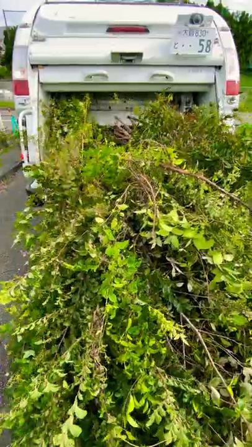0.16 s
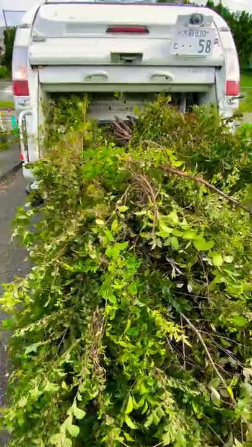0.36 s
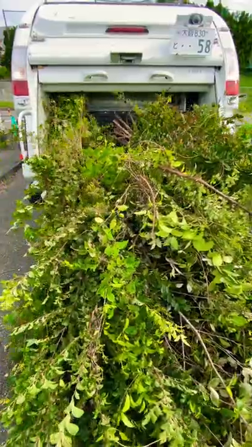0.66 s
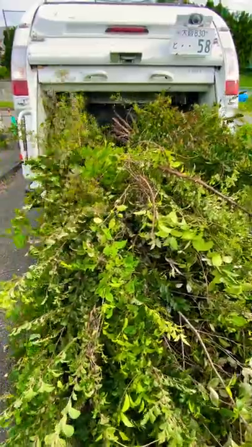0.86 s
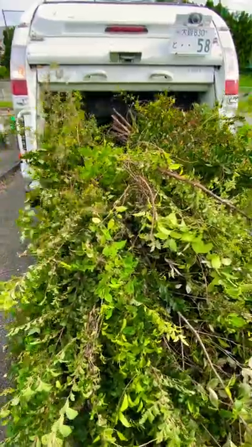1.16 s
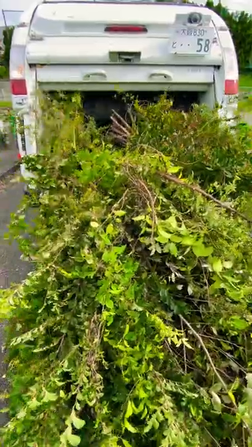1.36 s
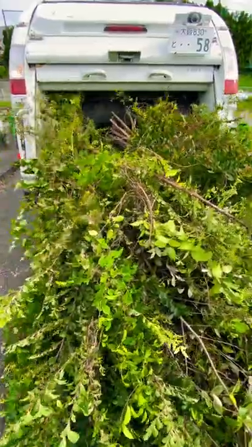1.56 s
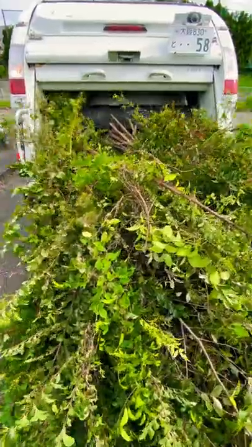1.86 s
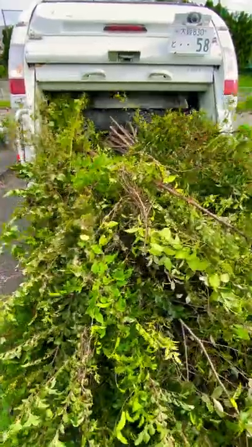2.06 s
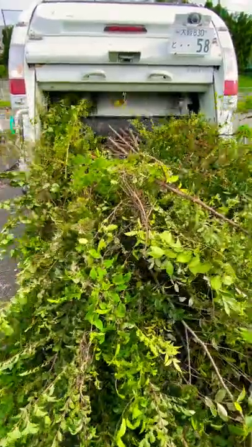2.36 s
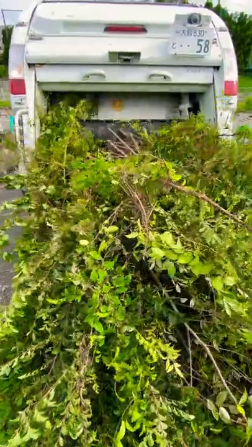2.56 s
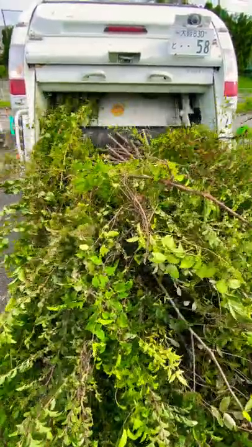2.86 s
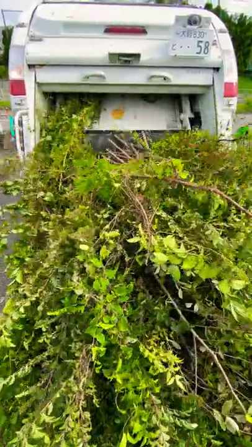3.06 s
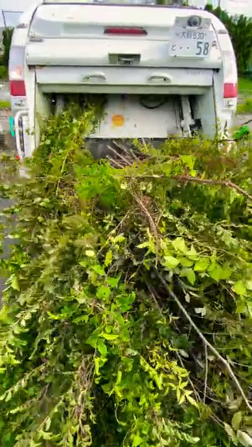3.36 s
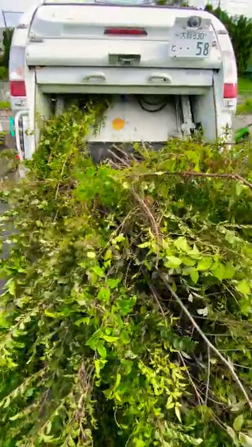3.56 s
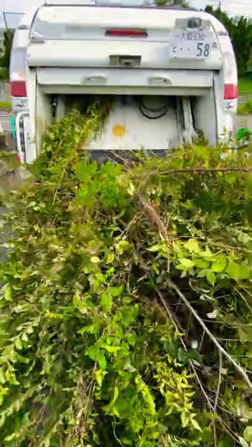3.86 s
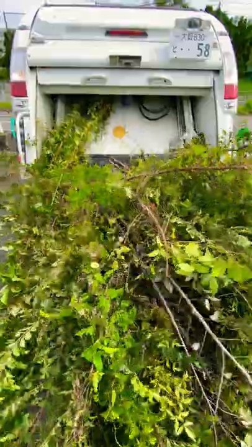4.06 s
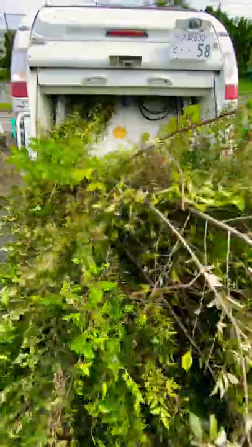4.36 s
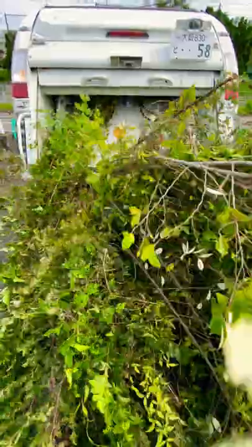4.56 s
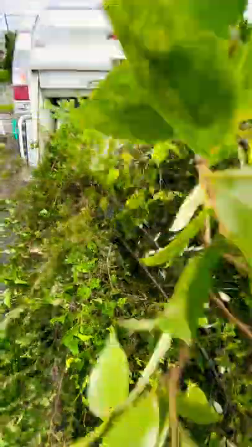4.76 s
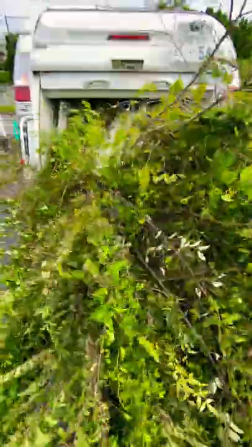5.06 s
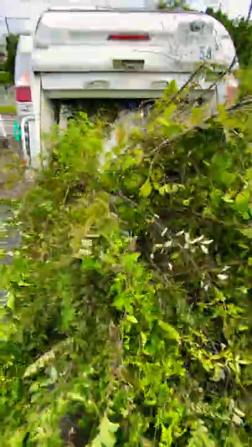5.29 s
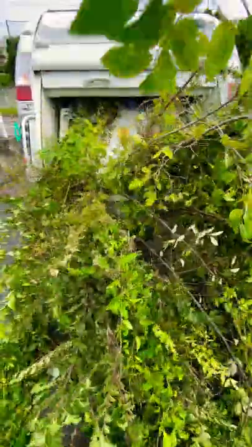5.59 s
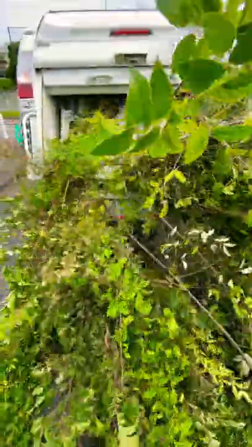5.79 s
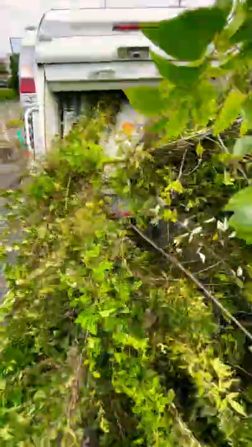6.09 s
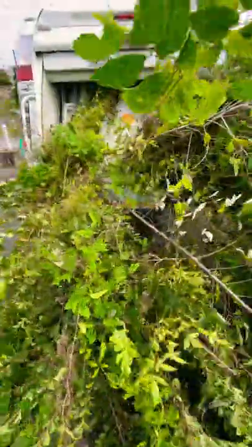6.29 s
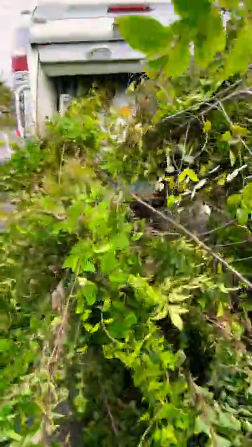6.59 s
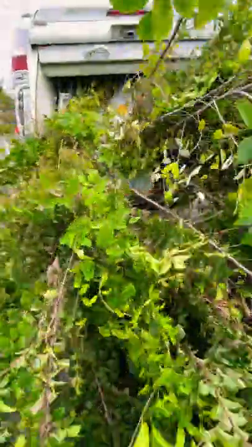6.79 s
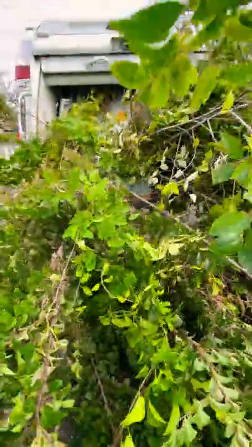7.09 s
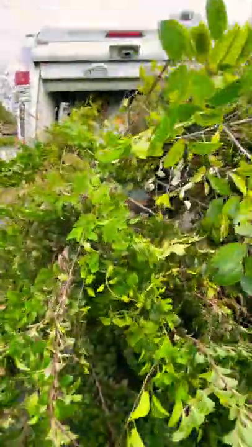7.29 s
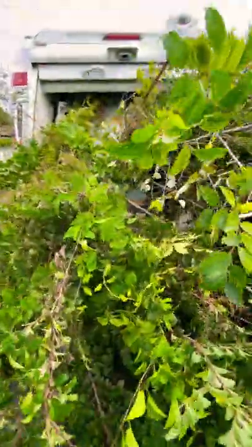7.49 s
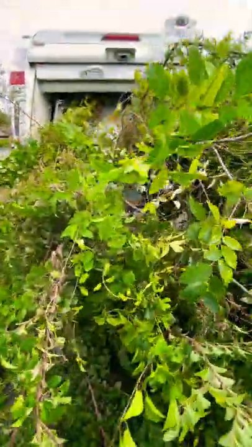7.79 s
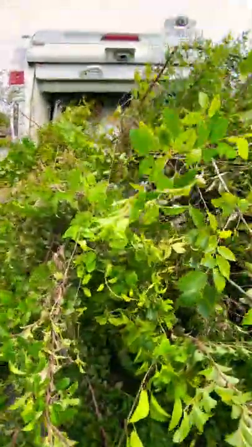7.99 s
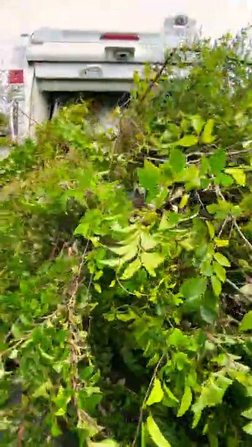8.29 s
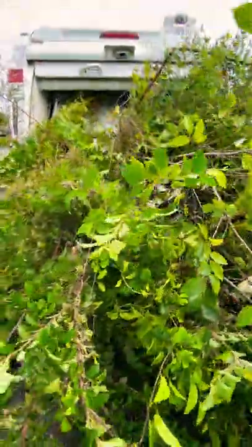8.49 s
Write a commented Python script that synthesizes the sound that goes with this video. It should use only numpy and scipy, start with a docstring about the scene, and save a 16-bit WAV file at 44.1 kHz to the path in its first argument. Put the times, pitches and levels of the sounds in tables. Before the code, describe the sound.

From the start a diesel at fast idle clatters and drones nearby outdoors, with a low hydraulic hum around it, swelling in uneven loads, and a faint high valve whistle fading by about 1.2 s. At 1.2 s a loud sharp snap and booming steel knock ring from the hopper. Light snaps follow near 1.9 to 2 s while leaf rustle and twig ticks gradually thicken. From 3.8 to 4.3 s snaps, dull crunching thumps and hopper knocks gather with a strong rustling tug. At 4.5 to 4.8 s leaves scrape and tap right on the microphone, ducking the truck. The pump pitch sags near 5 s; low wind puffs come until about 6.5 s. Woody cracks hit at 5.5, 5.9 and 6.06 s, the last with rattling metal and a crunch at 6.15 s. Afterwards the rustle subsides; engine clatter, whine and weaker hum continue to 8.6 s, with a small snap near 7.9 s.

```python
"""A heap of leafy branches is dragged into the hopper of a rear-loading garbage truck, close to a phone.
Leaves are dense noise ticks, twigs and snaps short dying bursts; boughs and blows on the steel ring modes.
The diesel is shaped noise and tones at fast idle; the hydraulic pump is a harmonic hum whose pitch sags
and whose level swells under load. Leaves swipe the microphone in gritty strokes, then low noise buffets it."""
import sys
import numpy as np
from scipy import signal
from scipy.fft import rfft, irfft
from scipy.io import wavfile
from scipy.ndimage import uniform_filter1d

SR = 44100
rng = np.random.default_rng(int(sys.argv[2]) if len(sys.argv) > 2 else 0)


def generate_wav(signal):
    """Clip the signal to [-1, 1] and save it as 16-bit WAV at the path in sys.argv[1]."""
    frames = np.transpose(np.atleast_2d(signal))
    scaled = np.clip(frames, -1, 1) * 32767
    pcm = np.round(scaled).astype(np.int16)
    wavfile.write(sys.argv[1], SR, pcm)


N = 381024
TIME, BINS = np.arange(N) / SR, np.fft.rfftfreq(N, 1 / SR)  # seconds, Hz


def gain_of(db):
    """Decibels to amplitude."""
    return 10 ** (np.asarray(db) / 20)


def evened(x):
    """Scales to rms 1."""
    return x / np.sqrt(np.mean(x ** 2) + 1e-20)


def curves(rows):
    """Each column of a timed table, interpolated sample by sample."""
    seconds, *columns = np.transpose(rows)
    return [np.interp(TIME, seconds, column) for column in columns]


def read(rows, hz):
    """Each column of a frequency table, joined on a log axis."""
    f, *columns = np.transpose(rows)
    return [np.interp(np.log(hz + 1), np.log(f + 1), column) for column in columns]


def colour(x, spectrum, extra_db=0):
    """Filters x through a spectrum, then scales it to rms 1."""
    gain = gain_of(read(spectrum, BINS)[0] + extra_db)
    return evened(irfft(rfft(x) * gain, N))


def band(x, hz, spread, order=3):
    """A broad causal band from hz / spread to hz * spread."""
    spread = max(spread, 1.1)
    edges = [hz / spread, min(hz * spread, .45 * SR)]
    return signal.sosfilt(signal.butter(order, edges, "band", fs=SR, output="sos"), x)


def wander(hz):
    """Slow chance up to about hz, rms 1."""
    return evened(irfft(rfft(rng.standard_normal(N)) * np.exp(-(BINS / hz) ** 2), N))


def held(start, length, attack, release):
    """Attack, hold and release, from 0 to 1; the release begins after length."""
    rise = (TIME - start) / attack
    fall = 1 - (TIME - start - length) / release
    return np.clip(np.minimum(rise, fall), 0, 1)


def surges(rows):
    """A bell-shaped gain for each row."""
    return [gain_of(db) * np.exp(-((TIME - middle) / half) ** 2 / 2) for middle, half, db in rows]


def together(*gains):
    """Gains that add in power."""
    return np.sqrt(sum(g ** 2 for g in gains))


def add(mix, s, sound):
    """Adds a two-channel sound at time s."""
    part = mix[:, round(s * SR):][:, :sound.shape[1]]
    part += sound[:, :part.shape[1]]


def at_level(x, db):
    """Sets the level of the loudest few milliseconds."""
    power = uniform_filter1d((x ** 2).mean(0), size=260)
    return gain_of(db) * x / np.sqrt(power.max())


def tone(hz, gain, waver_db):
    """A sine on a pitch curve whose strength wavers."""
    turns = np.cumsum(hz) / SR + rng.random()
    return np.sqrt(2) * gain * gain_of(waver_db * wander(4.6)) * np.sin(2 * np.pi * turns)


def crackle(per_s, spread_db):
    """Random clicks, mostly small and a few large."""
    size = gain_of(spread_db * np.minimum(rng.exponential(1, N), 5))
    return size * (rng.random(N) < per_s / SR) * rng.choice([-1, 1], N)


def scatter(t60, order=16000):
    """A dense dying cloud of reflections, different for each port; order is its length in samples."""
    t = np.arange(order) / SR
    return rng.standard_normal((2, order)) * gain_of(-60 * t / t60)


# Wind rumble on the microphone. Each row: frequency in Hz, relative spectrum level in dB.
BUFFET = [(10, -29), (30, 1), (56, 8.5), (75, 11), (110, 8.5), (170, -6), (280, -9.5), (700, -77)]
# Puffs from swiping leaves and gusts of breeze. Each row: middle in s, bell half-length in s, level in dB.
GUSTS = [(4.55, .025, -25), (4.64, 0.058, -23), (4.765, 0.022, -22), (5.1, .1, -34), (5.8, 0.062, -22),
         (6.23, 0.11, -18), (6.5, 0.044, -17)]
# One breath of breeze.
BREEZE_START_S, BREEZE_LENGTH_S, BREEZE_ATTACK_S, BREEZE_RELEASE_S, BREEZE_DB = 4.72, 1.7, 0.59, 1.9, -23


def wind():
    """Lumpy low eddies from the breeze and passing leaves, opposite in sign in the two channels."""
    eddies = colour(rng.standard_normal(N) * gain_of(2.1 * wander(13)), BUFFET)
    breeze = gain_of(BREEZE_DB) * held(BREEZE_START_S, BREEZE_LENGTH_S, BREEZE_ATTACK_S, BREEZE_RELEASE_S)
    return together(breeze, *surges(GUSTS)) * eddies * np.array([[1.1], [-.8]])


# Tone of the engine's low rumble. Each row: frequency in Hz, relative spectrum level in dB.
RUMBLE = [(10, -50.5), (22, -46.5), (35, -13), (58, 1.5), (90, 0), (130, -4), (190, -3), (270, -14.5),
          (400, -31.5), (900, -69)]
# Rumble fader. Each row: time in seconds, level in dB.
RUMBLE_LEVEL = [(0, -30), (1.1, -30.5), (1.6, -27), (2.6, -30.5), (3.8, -29), (4.3, -32.5), (5.5, -36),
                (6.4, -36), (7.1, -46), (7.6, -43), (8.1, -34)]


def engine_rumble():
    """The engine's low rumble: shaped noise, not dipped during the swipes."""
    return gain_of(curves(RUMBLE_LEVEL)[0]) * colour(rng.standard_normal((2, N)), RUMBLE)


FIRING_HZ = 37.67  # mean firing rate of the engine
# Whine of belts and gears. Each row: pitch in Hz, level in dB before the whine fader.
WHINE = [(549, -57), (619, -47), (657, -44.5), (926, -51), (1061, -55), (1410, -54), (1631, -56.5)]
# Whine fader, clearest beside the truck. Each row: time in seconds, added level in dB.
WHINE_LEVEL = [(0, 2), (.9, 4.5), (2, -2), (4.3, -13), (5.5, 2), (7.2, 6)]
# Steady exhaust drone. Each row: multiple of the firing rate, level in dB.
DRONE_ORDERS = [(2, -41), (4, -45.5)]
# Passing exhaust booms. Each row: start in seconds, length in seconds, multiple of the firing rate,
# level in dB.
BOOMS = [(-.13, 0.37, 4, -29.5), (4.04, 0.2, 2, -25), (7.056, 0.89, 4, -34.5), (7.917, .7, 2, -33)]
BOOM_ATTACK_S, BOOM_RELEASE_S = 0.12, 0.66


def engine_tones():
    """Exhaust drone and the whine of belts and gears, all on one unsteady shaft speed."""
    speed = 1 + 0.00248 * wander(3.53) + 0.00838 * wander(27.2)
    whine_db = curves(WHINE_LEVEL)[0]
    out = sum(tone(hz * speed, gain_of(db + whine_db), waver_db=3.5) for hz, db in WHINE)
    for order, steady_db in DRONE_ORDERS:
        booms = [gain_of(db) * held(start, length, BOOM_ATTACK_S, BOOM_RELEASE_S)
                 for start, length, boom_order, db in BOOMS if round(boom_order) == round(order)]
        drone = together(gain_of(steady_db), *booms)
        out += tone(round(order) * FIRING_HZ * speed, drone, waver_db=2.5)
    return out


# Tone of the clatter before the panels. Each row: frequency in Hz, relative spectrum level in dB.
CLATTER = [(80, -24), (150, -2), (200, 6.5), (280, -1), (380, -2.5), (470, -1.5), (600, -5.5), (850, -3),
           (1100, -7), (1600, -9), (2000, -11.5), (2500, -13), (3200, -16.5), (3900, -18.5), (6000, -20),
           (12000, -47)]
# Body panel resonances and one dip. Each row: centre in Hz, width in Hz, gain in dB.
PANELS = [(446, 100, 4), (640, 27, 3.5), (1061, 10.4, 12.5), (1464, 18, -13.5), (1600, 78, 1),
          (2360, 170, 2), (3120, 144, 5), (5600, 130, 7.5)]
# Change of tone beside the truck. Each row: frequency in Hz, relative gain in dB.
BESIDE = [(160, 6.5), (220, -1), (310, -1.5), (500, 0.6), (850, -2.5), (1500, 2), (2500, 0), (4000, -1)]
CLATTER_DB, BESIDE_DB = -27, 1.37  # level away from the side, and the lift beside the truck
SIDESTEP_START_S, SIDESTEP_LENGTH_S = 6, 0.85  # the phone steps beside the truck


def engine_clatter():
    """An uneven puff of noise at every firing, coloured by the body panels."""
    firings = np.cumsum(FIRING_HZ * (1 + .02 * wander(10))) / SR
    puffs = 1 + 0.18 * np.exp(-(firings % 1) / 0.47) * gain_of(5.4 * wander(33))
    panels_db = sum(db / (1 + (2 * (BINS - hz) / width) ** 2) for hz, width, db in PANELS)
    clatter = colour(puffs * rng.standard_normal((2, N)), CLATTER, panels_db)
    beside = gain_of(BESIDE_DB) * colour(clatter, BESIDE)
    aside = np.clip((TIME - SIDESTEP_START_S) / SIDESTEP_LENGTH_S, 0, 1)
    return gain_of(CLATTER_DB) * ((1 - aside) * clatter + aside * beside)


# Valve whistle early in the stroke. Each row: time in seconds, pitch in Hz, level in dB.
VALVE = [(0, 2520, -49), (.14, 2570, -41), (.17, 2430, -50), (.37, 2465, -45), (.7, 2450, -55),
         (1.1, 2502, -51), (1.2, 2502, -58)]


def valve():
    """A faint unsteady whistle, probably oil passing a valve."""
    hz, db = curves(VALVE)
    return tone(hz * (1 + 0.0055 * wander(80)), gain_of(db), waver_db=4.5)


# Gear whine. Each row: time in seconds, pitch in Hz, level in dB.
GEAR = [(0, 463, -41), (1.1, 458, -36.5), (1.6, 478, -50), (2.3, 486, -37), (3.2, 486, -51.5),
        (4.3, 488, -48), (5.4, 467, -41.5), (7.2, 472, -39.5), (8.6, 467, -35)]


def gear():
    """A gear's whine drifts in pitch as the blade works."""
    hz, db = curves(GEAR)
    return tone(hz * (1 + 0.0047 * wander(19.2)), gain_of(db), waver_db=2.5)


# Pump fundamental. Each row: time in seconds, pitch in Hz.
PUMP_SPEED = [(0, 109.2), (1.35, 108.7), (1.6, 111.6), (2.1, 109.6), (4, 112.2), (4.2, 113.3),
              (4.75, 112.1), (5.03, 105.9), (5.45, 108.1), (5.9, 108.9), (6.15, 105.8), (6.45, 108.4)]
# Upper overtones running free. Each row: multiple of the fundamental, level in dB.
PUMP_OVERTONES = [(3, -44), (4, -47.5), (5, -49.5), (6, -62)]
# The blade loads the pump. Each row: start in seconds, length in seconds, fundamental in dB, octave in dB.
LOADS = [(0, 0.34, -25.5, -26.5), (1.14, 0.19, -23, -27.5), (1.44, 0.72, -31, -30), (1.677, .2, -36, -28.5),
         (2.234, .52, -38, -29), (2.93, .6, -33.5, -30), (3.66, 0.36, -46, -25.5), (4.098, 0.24, -30, -27),
         (4.822, 0.5, -51, -26), (6.15, 0.12, -24, -40), (6.297, 0.19, -32.5, -26), (6.652, 0.64, -52, -37),
         (7.76, 0.7, -32.5, -49)]
LOAD_ATTACK_S, LOAD_RELEASE_S = 0.054, 0.12
FREE_HUM_DB, FREE_OCTAVE_DB = -39, -33.5  # the pump running free
OVERTONE_GROWTH = 0.36  # dB of overtone rise per dB of octave rise
PUMP_FLUTTER_DB = .9


def pump():
    """Pressure ripple of the gear pump: a harmonic hum that swells with each load."""
    hz = curves(PUMP_SPEED)[0] * (1 + 0.0028 * wander(15.5))
    first, second = gain_of(FREE_HUM_DB), gain_of(FREE_OCTAVE_DB)
    for start, length, first_db, second_db in LOADS:
        load = held(start, length, LOAD_ATTACK_S, LOAD_RELEASE_S)
        first = together(first, gain_of(first_db) * load)
        second = together(second, gain_of(second_db) * load)
    hum = tone(hz, first, waver_db=1.0) + tone(2 * hz, second, waver_db=1.13)
    hum = hum * gain_of(PUMP_FLUTTER_DB * wander(22))  # oil pressure flutters as wood resists and yields
    strain = (second / gain_of(FREE_OCTAVE_DB)) ** OVERTONE_GROWTH
    overtones = sum(tone(round(k) * hz, gain_of(db) * strain, waver_db=2.0) for k, db in PUMP_OVERTONES)
    return hum + overtones


# Tone of leaf grit on the phone. Each row: frequency in Hz, relative spectrum level in dB.
SWIPE = [(20, -22), (100, 12), (300, 0), (450, 1), (650, -10), (950, -6), (1400, -10), (3000, -15.5),
         (8000, -9.5), (12000, -15), (16000, -19)]
# Strokes. Each row: start in seconds, level in dB, length in seconds, bass corner in Hz,
# treble corner in Hz.
SWIPES = [(4.484, -23.5, .014, 300, 4530), (4.489, -23, .038, 3000, 10000), (4.518, -30, .06, 2500, 9000),
          (4.488, -28.5, .085, 300, 1500), (4.535, -31, .22, 300, 4500), (4.582, -35, .019, 700, 2200),
          (4.611, -27, .021, 350, 1700), (4.671, -32, .012, 500, 2500), (4.67, -34, .07, 4000, 10000),
          (4.723, -18.5, .034, 600, 1800), (4.719, -25, .052, 2200, 9000), (4.745, -34, .05, 800, 6000)]


def swipes():
    """Leaves catch and slip over the phone in short gritty strokes, nearly opposite in the two channels."""
    catches = (crackle(per_s=3000, spread_db=2.2) * gain_of(2.5 * wander(160)) for _ in range(2))
    grit, other = (colour(c, SWIPE) for c in catches)
    shared = .5 * band(other, 4330, spread=1.96) + 0.082 * other
    scrape = np.array([shared + grit, shared - grit])
    out = np.zeros((2, N))
    for s, db, length, low_hz, high_hz in SWIPES:
        stroke = scrape[:, round(s * SR):][:, :max(round(length * SR), 20)]
        top = min(high_hz, .4 * SR)
        corners = [min(low_hz, top / 2), top]
        stroke = signal.sosfilt(signal.butter(1, corners, "band", fs=SR, output="sos"), stroke)
        add(out, s, gain_of(db) * evened(stroke * signal.windows.hann(stroke.shape[1])))
    return out


# Stems tapping the phone. Each row: start in seconds, level in dB, centre in Hz.
TAPS = [(4.4905, -22, 1500), (4.5235, -14, 6000), (4.5385, -26, 1700), (4.5565, -21.5, 4500),
        (4.6075, -25, 8500), (4.659, -22, 2400)]
TAP_T60_S = .008


def taps():
    """A stem flicks the phone: one dry click, stronger at the left port and inverted at the right."""
    out = np.zeros((2, N))
    for s, db, hz in TAPS:
        click = band(scatter(TAP_T60_S, order=900)[0], hz, spread=2.1, order=2)
        add(out, s, at_level(click * np.array([[1], [-.3]]), db))
    return out


# A bough is tugged through the heap. Each row: middle in seconds, bell half-length in seconds, level in dB.
TUGS = [(1.07, 0.044, -38.5), (1.35, 0.07, -43), (4.25, 0.15, -27), (5.65, .07, -32.5), (6.12, 0.22, -37),
        (7.9, .045, -40)]
# The blade drags the heap: leaves rustle more and more, then settle.
DRAG_START_S, DRAG_LENGTH_S, DRAG_ATTACK_S, DRAG_RELEASE_S = 0.74, 5.45, 2.88, 0.35
DRAG_DB, RESTING_LEAVES_DB = -35.3, -42  # resting level before the drag
SETTLED_DB = -3  # the packed heap rustles less afterwards


def pulling():
    """How strongly the heap is stirred: resting leaves, the long drag and the tugs added in power."""
    drag = gain_of(DRAG_DB) * held(DRAG_START_S, DRAG_LENGTH_S, DRAG_ATTACK_S, DRAG_RELEASE_S)
    settled = np.clip((TIME - DRAG_START_S - DRAG_LENGTH_S) / DRAG_RELEASE_S, 0, 1)
    return together(gain_of(RESTING_LEAVES_DB + SETTLED_DB * settled), drag, *surges(TUGS))


# Tone of the rustle. Each row: frequency in Hz, relative spectrum level in dB.
FOLIAGE = [(200, -30), (800, -8), (2000, -3), (4500, -.7), (6000, .3), (7500, .7), (11000, 0), (13000, -4),
           (16000, -18)]


def foliage():
    """Thousands of leaf and twig ticks in clumps: each a tiny burst that echoes briefly inside the heap."""
    power = crackle(per_s=1800, spread_db=4) ** 2 * gain_of(3.5 * wander(25))
    tick, echo = (signal.lfilter([1 / (life_s * SR)], [1, -np.exp(-1 / (life_s * SR))], power)
                  for life_s in (.0006, .012))
    leaves = np.sqrt(tick + 1.2 * echo) * rng.standard_normal((2, N))
    return pulling() * colour(leaves, FOLIAGE)


# Twigs, thick to thin. Each row: centre in Hz, level in dB of the largest tick at full drag strength.
TWIG_SIZES = [(2200, -32), (3400, -31.5), (5000, -33), (6800, -31), (11000, -38)]
TWIGS_PER_S = 10  # of each size, at full drag strength
TWIG_SPREAD_DB, TWIG_T60_S = 10, 0.021


def twigs():
    """Thin twigs flick and break one by one, oftener and louder the harder the heap is pulled."""
    pull = pulling() / gain_of(DRAG_DB)
    out = np.zeros((2, N))
    for hz, db in TWIG_SIZES:
        breaks = rng.random(N) < TWIGS_PER_S * pull / SR
        clicks = breaks * gain_of(-TWIG_SPREAD_DB * rng.random(N)) * np.sqrt(pull)
        tick = at_level(band(scatter(TWIG_T60_S, order=3000), hz, spread=1.3, order=2), db)
        out += signal.oaconvolve(clicks[None], tick, axes=1)[:, :N]
    return out


# The blade crushes a bundle of wood. Each row: middle in seconds, bell half-length in seconds, force in dB.
CRUSHES = [(4.18, .025, -24.5), (4.29, 0.04, -28.5), (6.17, 0.041, -26.5)]
# Thumps of crushed wood, heavy to light. Each row: centre in Hz, level in dB before the force.
THUMP_SIZES = [(170, -2.5), (290, -1.5), (480, -2.5), (850, -16)]
THUMPS_PER_S, THUMP_T60_S = 70, .07  # rate of each size


def crunch():
    """Crushed wood gives way in an irregular run of dull thumps inside the hopper."""
    force = together(*surges(CRUSHES))
    out = np.zeros((2, N))
    for hz, db in THUMP_SIZES:
        breaks = (rng.random(N) < THUMPS_PER_S / SR) * gain_of(-6 * rng.random(N)) * force
        thump = at_level(band(scatter(THUMP_T60_S, order=6000), hz, spread=1.4, order=2), db)
        out += signal.oaconvolve(breaks[None], thump, axes=1)[:, :N]
    return out


# Boughs striking and cracking. Each row: start in seconds, level in dB, 60 dB decay in seconds,
# then four resonances in Hz, strongest first.
BOUGHS = [(5.518, -17.5, 0.055, 800, 1090, 1254, 1980), (5.529, -18, 0.093, 1060, 620, 930, 2595),
          (5.536, -20.5, .08, 463, 622, 348, 1239), (5.9015, -17.5, 0.081, 670, 1137, 444, 980),
          (6.062, -23, 0.053, 1690, 2360, 1506, 2200), (6.064, -20, 0.17, 990, 874, 2340, 570)]
WOOD_STEP_DB, BARK_DB = -3, 4  # step from one resonance to the next; bark before its band filter
CONTACT_S = 0.0007


def boughs():
    """A struck bough rings briefly on four bending resonances, with a rattle of bark."""
    out = np.zeros((2, N))
    for s, db, t60, *pitches in BOUGHS:
        bark = scatter(t60)
        t = np.arange(bark.shape[1]) / SR
        ring = sum(gain_of(WOOD_STEP_DB * k) * np.sin(2 * np.pi * (hz * t + rng.random((2, 1))))
                   for k, hz in enumerate(pitches))
        ring = ring * np.minimum(t / CONTACT_S, 1) * gain_of(-60 * t / t60)
        rattle = gain_of(BARK_DB) * band(bark, pitches[0], spread=1.65)
        add(out, s, at_level(ring + rattle, db))
    return out


# Wood snapping. Each row: start in seconds, level in dB, centre in Hz, 60 dB decay in seconds.
SNAPS = [(1.194, -18.5, 3120, 0.17), (1.295, -34.5, 4500, 0.049), (1.884, -30, 11000, 0.093),
         (2.024, -29, 7040, 0.033), (2.036, -25, 7500, 0.039), (3.772, -34, 5000, .035),
         (3.859, -28.5, 6900, 0.057), (3.995, -25, 3680, 0.057), (4.071, -23, 8500, 0.09),
         (4.24, -23, 3400, 0.1), (4.587, -26.5, 1790, 0.06), (5.14, -25, 12300, 0.056),
         (5.585, -24, 5460, 0.046), (5.877, -26, 6050, 0.026), (5.882, -22, 6600, 0.044),
         (6, -22.5, 10200, 0.06), (6.062, -24.5, 2000, 0.041), (6.063, -21.5, 5300, 0.18),
         (7.359, -37, 5500, 0.097), (7.884, -33, 6025, 0.24)]


def snaps():
    """Wood fibres give way in a quick ragged burst that dies among the branches."""
    out = np.zeros((2, N))
    for s, db, hz, t60 in SNAPS:
        burst = scatter(t60)
        ragged = evened(uniform_filter1d(rng.standard_normal(burst.shape[1]), size=60))
        fibres = gain_of(1.4 * ragged)
        add(out, s, at_level(band(burst * fibres, hz, spread=1.92), db))
    return out


# Modes of the steel hopper. Each row: pitch in Hz, relative level in dB, 60 dB decay in seconds undamped.
HOPPER = [(107.6, 0, 0.05), (216, -0.5, 0.21), (279, -14.5, 0.33), (476, -4.5, 0.23), (530, 0, 0.026),
          (670, -5.5, 0.18), (816, -0.5, 0.054), (1040, -15.5, 0.1), (1170, -3, 0.083), (2336, -7, 0.14),
          (2840, -11, .12)]
# Blows of blade and boughs. Each row: start in seconds, level in dB, centre in Hz,
# rattle's 60 dB decay in seconds.
KNOCKS = [(1.195, -14, 640, 0.35), (1.199, -13.5, 190, 0.78), (1.2091, -15, 470, 0.18),
          (4.135, -26.5, 900, 0.18), (4.155, -23, 169, 0.15), (4.186, -18, 107, 0.13),
          (4.245, -24, 426, 0.35), (4.276, -25, 255, 0.14), (6.063, -22.5, 815, 0.62),
          (6.138, -27.5, 398, 0.3), (6.16, -25.5, 433, 0.17)]


def knocks():
    """Each blow rattles the hopper and rings its modes, heard through a band around the blow's centre."""
    out = np.zeros((2, N))
    for s, db, hz, t60 in KNOCKS:
        rattle = scatter(t60)
        t = np.arange(rattle.shape[1]) / SR
        ring = sum(gain_of(mode_db - 60 * t / decay) * np.sin(2 * np.pi * (f * t + rng.random((2, 1))))
                   for f, mode_db, decay in HOPPER)
        pressed = gain_of(-20 * t / t60)  # wood lying on the steel damps it
        add(out, s, at_level(band(rattle + 0.44 * ring * pressed, hz, spread=1.39, order=2), db))
    return out


# Left-right balance, likeness and phase of airborne sound; the treble is set nearly opposite in the
# two channels. Each row: frequency in Hz, left-right balance in dB, coherence from 0 to 1,
# left lead in radians.
PORTS = [(60, -1, .97, 0), (200, -7, .99, -.2), (340, -8, .9, 0), (480, -17, .3, .7), (650, -5.5, .63, 2.1),
         (850, -.5, .78, 1.6), (1100, -4.5, .75, 1.2), (1700, -3, .73, 1.1), (2500, -1, .66, 1.6),
         (3600, -4.2, .3, 1.3), (5000, -3.5, .7, 2.8), (6200, -2.5, .63, 1.9), (7600, 0, .8, 2.2),
         (8600, 0, .998, 3.14), (10500, 0, .999, 3.14), (11400, 0, .99, 3.14), (12100, 0, .94, 3.14),
         (13000, 0, .78, 3.4), (15500, 0, .7, 5.5)]


def ports(direct, diffuse):
    """Gives the two ports different colour and phase; the diffuse part is only partly alike."""
    balance_db, alike, lead = read(PORTS, BINS)
    alike, ratio = np.clip(alike, 0, 1), gain_of(balance_db)
    right, other = rfft(diffuse)
    left = alike * right + np.sqrt(1 - alike ** 2) * other + rfft(direct)
    pair = np.array([left * ratio * np.exp(1j * lead), right + rfft(direct)])
    return irfft(pair * np.sqrt(2 / (1 + ratio ** 2)), N)


# Brief dips in the level of truck, leaves and twigs between 4.48 and 4.77 s. # Each row: time in seconds, gain
# in dB.
DIPS = [(4.48, -3), (4.515, -23), (4.572, -17), (4.592, -1.5), (4.615, -10), (4.65, -13.5), (4.745, -16.5),
        (4.77, -2.5)]


def scene():
    """Truck and branches through the air; leaves and wind right on the microphone."""
    dip = gain_of(curves(DIPS)[0])
    hum = np.sqrt(dip) * pump()  # the hum dips half as much in dB
    hum = hum + dip * (engine_tones() + gear() + valve())
    din = engine_rumble() + dip * (engine_clatter() + foliage() + twigs())
    din = din + knocks() + crunch() + boughs() + snaps()
    return ports(hum, din) + swipes() + taps() + wind()


EDGE_HZ = 15850  # top of the recorder's band


def record(dry):
    """Soft overload on the sharpest peaks, then the recorder's band limit."""
    rounded = dry / (1 + (dry / .8) ** 6) ** (1 / 6)
    lowpass = signal.firwin(511, EDGE_HZ, window=("kaiser", 9), fs=SR)
    return signal.oaconvolve(rounded, lowpass[None], "same")


dry = scene()
out = record(dry)
generate_wav(out)
```